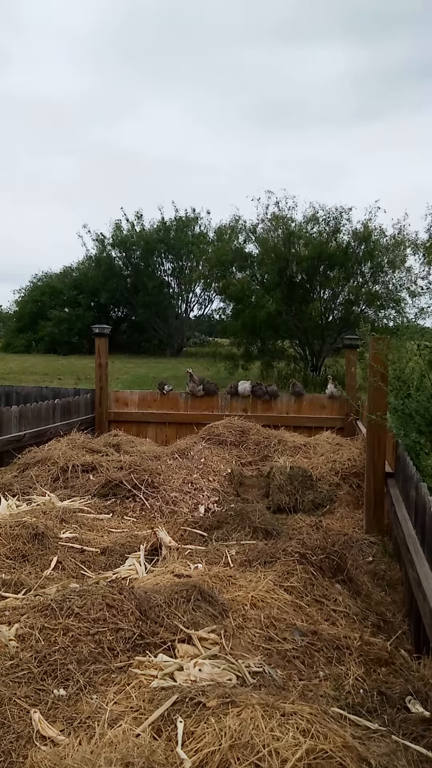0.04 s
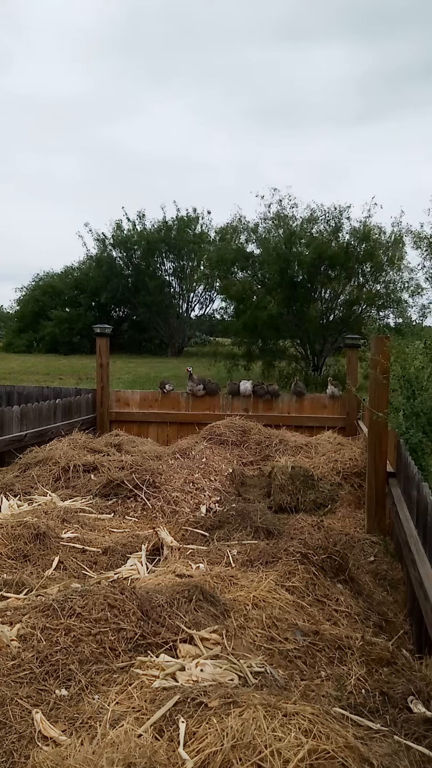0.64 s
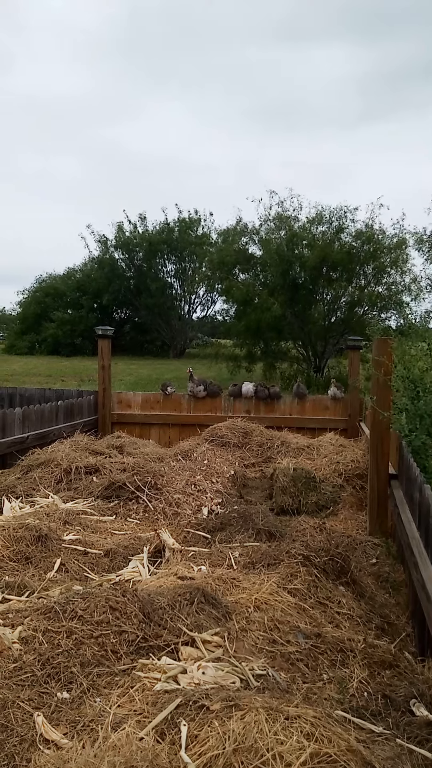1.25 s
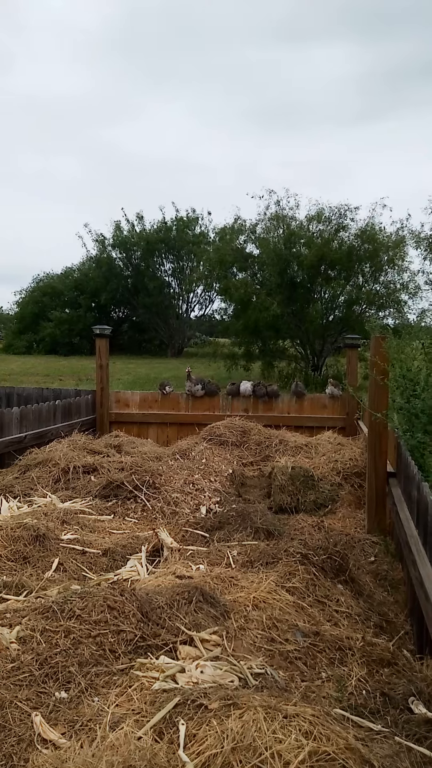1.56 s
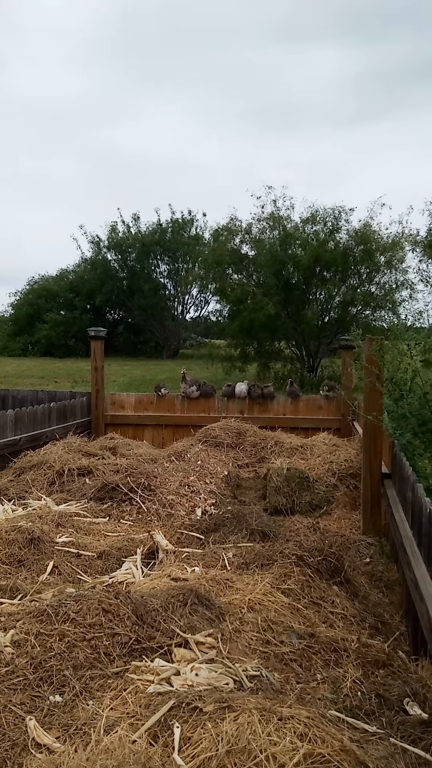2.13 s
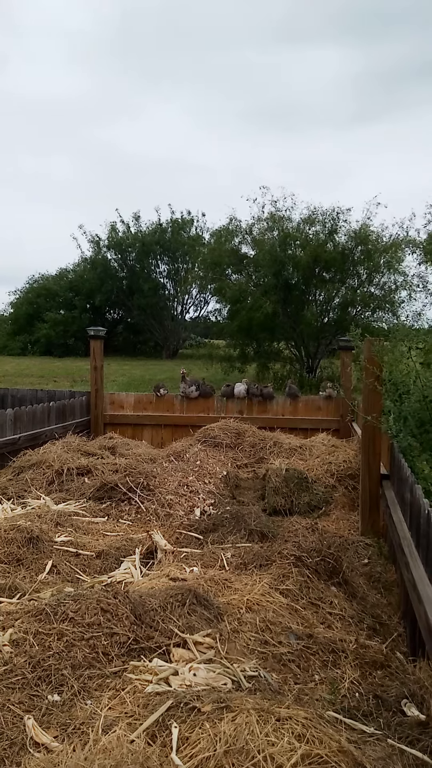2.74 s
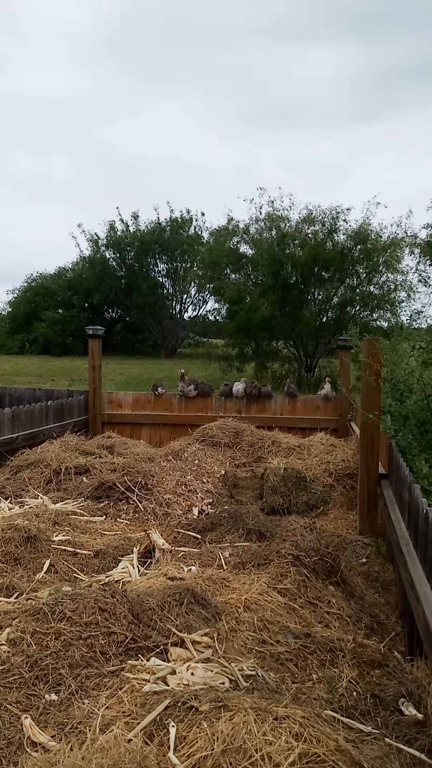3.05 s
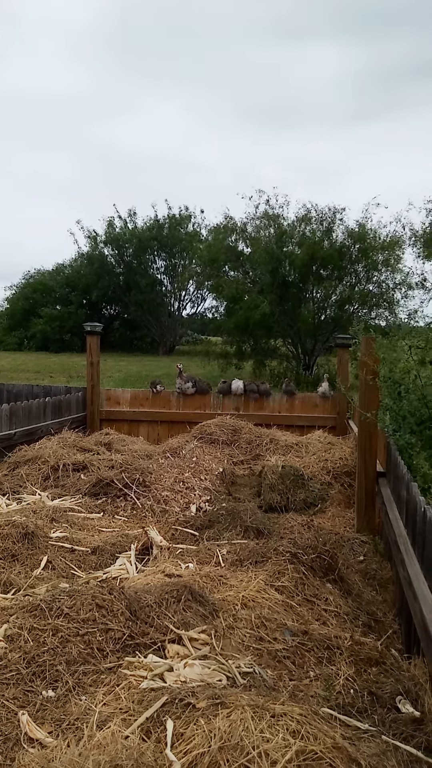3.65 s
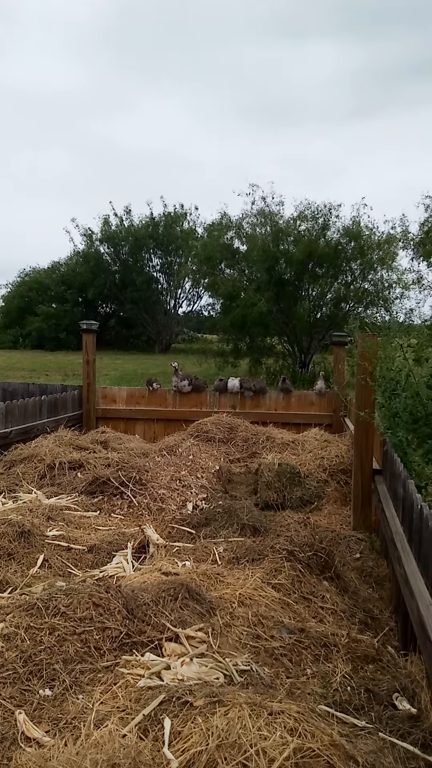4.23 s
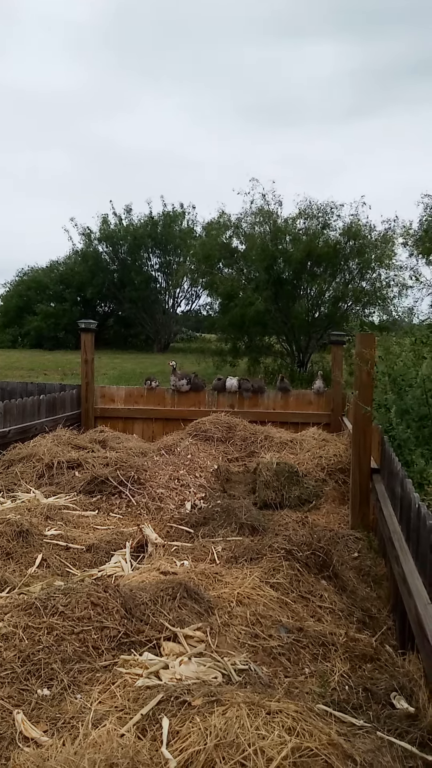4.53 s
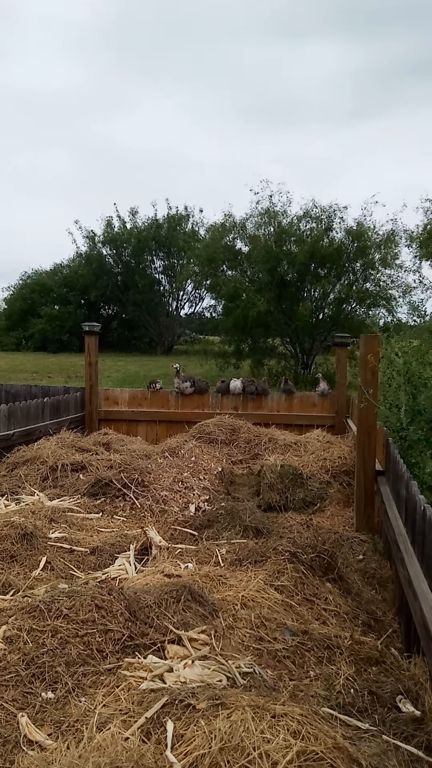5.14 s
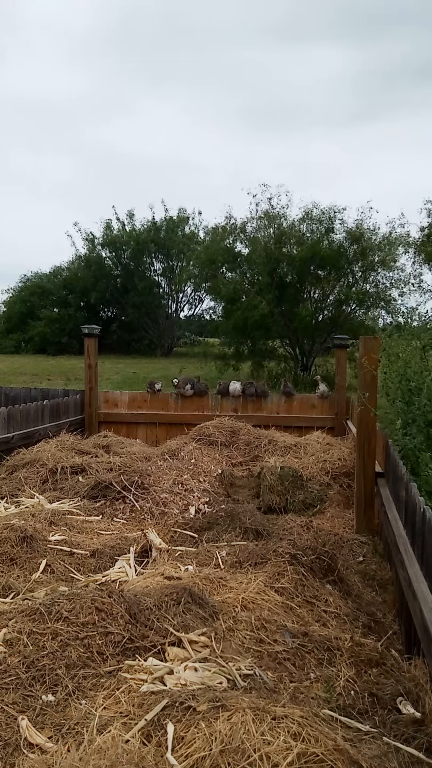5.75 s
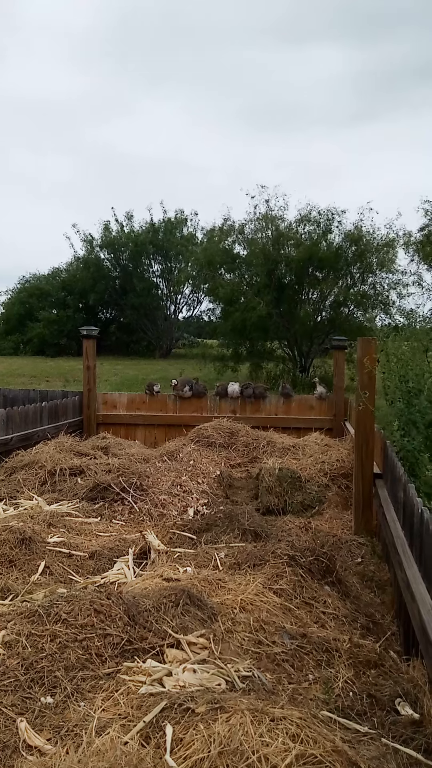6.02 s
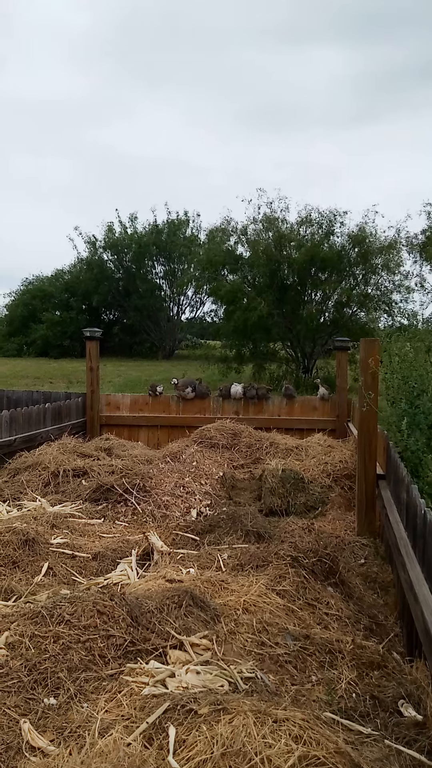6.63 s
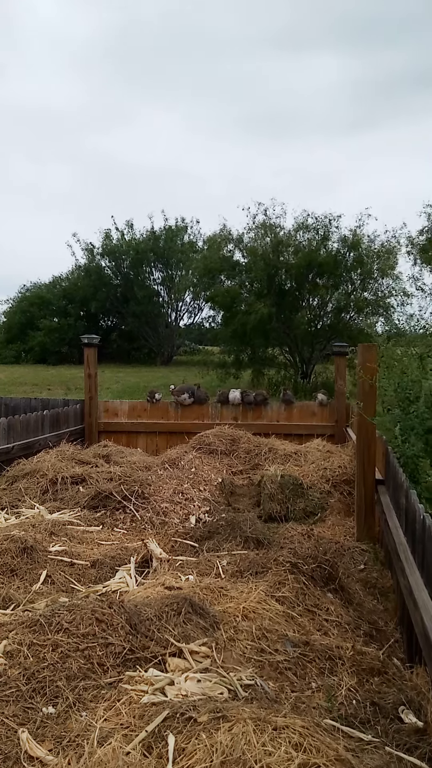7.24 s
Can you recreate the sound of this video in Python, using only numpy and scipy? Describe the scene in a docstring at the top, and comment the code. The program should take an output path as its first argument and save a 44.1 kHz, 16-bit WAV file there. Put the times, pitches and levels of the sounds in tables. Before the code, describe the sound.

A guinea hen calls from some metres away in an open farmyard, repeating a short rasp and a longer, harsh squawk that drops in pitch. The pair comes about every 0.6 seconds, from the start until the end at around 7.4 seconds. A second bird gives short, rough barks near 0.1, 1.1, 2.8, 3.5 and 4.4 seconds. Faint chirps and peeps are scattered throughout, and thin rising whistles come at about 0.3 and 1.2 seconds, then more clearly at 4.3, 5, 5.7 and 6.5. Wind rumbles on the microphone, with a small gust near 1 second and stronger, fluttering buffets and low thumps from 2.5 seconds, heaviest between about 3 and 5 and again around 6.6. The calls carry only a slight outdoor echo. Underneath lie quiet field noise, a soft insect shimmer and a very faint high whine.

```python
"""Guinea fowl in a windy farmyard.

A hen on a wooden fence, some metres off across a straw heap, repeats a short rasp and a long squawk.
The two sides of her syrinx beat into harsh sub-harmonics, shaped by throat and opening beak.
A second bird barks, the two loudest barks opening on a high note, amid whistles, chirps and peeps.
Fence, straw and trees scatter the calls.
Gusts buffet the microphone over quiet field noise, insects and a faint high whine."""
import sys
import numpy as np
from scipy import signal
from scipy.fft import rfft, irfft, next_fast_len
from scipy.io import wavfile
from scipy.ndimage import uniform_filter1d

SR = 44100
rng = np.random.default_rng(int(sys.argv[2]) if len(sys.argv) > 2 else 0)


def transcribe(signal):
    """Save signal, clipped to [-1, 1], as a 16-bit WAV file at the path in sys.argv[1]."""
    frames = np.atleast_2d(signal).T
    limited = np.clip(frames, -1, 1)
    pcm = np.round(limited * 32767).astype(np.int16)
    wavfile.write(sys.argv[1], SR, pcm)


N = 325458
TIME_S = np.arange(N) / SR
CUTOFF_HZ = 15750

# field noise spectrum: freq_hz, gain_db
FIELD_SPECTRUM = [(30, 0.5), (150, -3), (300, -15.5), (600, -16), (1200, -13), (2000, -19), (3000, -25.5),
                  (4000, -17), (5200, -36.5), (6300, -32.5), (8500, -32), (12000, -31.5), (15500, -37)]
# field noise gain below the treble shelf: time_s, gain_db
FIELD_GAIN = [(0, -62), (1, -63), (2, -64), (3, -64.5), (4, -63.5), (5, -61.5), (5.8, -65.5), (6.6, -56.5),
              (7.38, -58.5)]
# insect shimmer spectrum: freq_hz, gain_db
INSECT_SPECTRUM = [(4300, -33), (4950, 1), (5300, 0), (5700, -4.5), (6400, -15.5), (6750, -8), (7000, -4.5),
                   (7300, -27.5), (7650, -2), (8100, -36.5), (10000, -48)]
# steady whine: pitch_hz, level_db
WHINE_TONES = [(6998, -87.5), (7644, -90), (11994, -100)]
# brief swells of the whine: start_s, length_s, pitch_hz, level_db
WHINE_PEAKS = [(.8, .2, 7644, -79), (1.94, .3, 7644, -78), (3.038, 0.033, 7540, -68)]

# wind rumble spectrum: freq_hz, gain_db
RUMBLE_SPECTRUM = [(20, -39), (35, -33), (55, -4.5), (80, 4.5), (140, 2.5), (210, -4.5), (300, -15.5),
                   (450, -35.5), (900, -57.5), (2000, -85.5)]
# wind flutter spectrum: freq_hz, gain_db
FLUTTER_SPECTRUM = [(120, -25.5), (250, 6.5), (350, 3.5), (520, -6.5), (750, -19), (1100, -31),
                    (1800, -60.5), (4000, -97.5)]
# rumble between gusts: time_s, level_db
BREEZE_LEVEL = [(0, -50), (.85, -55.5), (1.12, -42), (1.6, -44), (2.0, -46), (2.45, -38.5), (2.78, -46.5),
                (3.03, -28.5), (3.42, -43.5), (3.75, -32.5), (4.5, -30), (4.75, -41.5), (5.02, -29.5),
                (5.33, -32), (5.52, -44.5), (5.87, -34.5), (6.42, -43), (6.76, -36.5), (7.38, -53)]
# gusts: start_s, length_s, rumble_db, flutter_re_rumble_db
WIND_GUSTS = [(0.429, .035, -37, -18), (.94, .16, -28.5, -8), (1.321, 0.21, -35, -15),
              (2.103, 0.074, -33, -29), (2.238, 0.07, -36, -25), (2.456, 0.075, -25, -2.5),
              (2.52, 0.076, -25.5, -3.5), (2.908, 0.063, -24, 1.5), (2.966, 0.073, -24.5, -4),
              (3.069, 0.042, -24, -2.5), (3.208, 0.04, -27, -3), (3.41, 0.039, -38.5, 0),
              (3.528, .12, -29, -19), (3.663, .09, -19, -9), (3.796, .09, -25.5, -8),
              (3.958, 0.13, -26, -9.5), (4.069, 0.16, -22, -10.5), (4.28, .11, -23, -11),
              (4.477, 0.096, -28.5, -7.5), (4.601, 0.093, -30, -11), (4.785, 0.053, -28.5, -3),
              (4.878, 0.056, -19.5, -9), (4.923, 0.14, -25.5, -5), (5.228, 0.22, -32, -6.5),
              (5.598, 0.069, -30.5, -7), (5.721, 0.045, -28.5, -5.5), (5.792, 0.047, -31, -3),
              (6.1, 0.044, -26, -8.5), (6.224, 0.12, -28, -16), (6.505, 0.14, -25.5, -6.5),
              (6.649, 0.051, -27, -12), (6.717, 0.061, -21.5, -14), (6.823, 0.075, -37, -6),
              (6.994, 0.035, -31.5, 0), (7.072, 0.048, -27.5, -9), (7.299, 0.039, -37, -17)]
# hardest eddies: centre_s, peak_db, centre_hz
EDDY_SLAPS = [(2.4704, -13, 256), (2.4759, -19, 350), (2.4884, -16.5, 342), (2.545, -20.5, 334),
              (2.921, -18.5, 263), (2.9426, -10.5, 626), (2.946, -11.5, 480), (2.985, -13.5, 358),
              (3.094, -18, 310), (3.278, -16.5, 125), (3.674, -17, 230), (3.702, -14, 283),
              (3.762, -14.5, 594), (3.807, -14, 157), (4.133, -19.5, 308), (4.298, -16, 200),
              (4.79, -18.5, 280), (5.742, -14.5, 345), (5.8, -20.5, 290), (6.193, -29, 288)]

# chirps, peeps and the high opening notes of the two loudest barks:
# start_s, length_s, first_hz, last_hz, relative_db, roughness
SHORT_NOTES = [(0.0, 0.022, 3200, 2990, -50, 0.12), (0.016, 0.041, 3740, 3050, -57, 0.2),
               (0.583, 0.043, 2400, 2890, -53.5, 0), (.88, .04, 1420, 1270, -54.5, .3),
               (0.885, .047, 2760, 2480, -60, .6), (1.049, .02, 2530, 2820, -57, .1),
               (1.068, .036, 1690, 1610, -38, 0.02), (1.215, .02, 2340, 2400, -59, 0.1),
               (1.27, .03, 3600, 2040, -57, 0.3), (1.485, .04, 3400, 2050, -62, .2),
               (1.55, .08, 2990, 2890, -59, 0.18), (1.606, 0.018, 2110, 2290, -52.5, 0.15),
               (1.702, 0.039, 3450, 1950, -58, 0), (1.814, 0.028, 1960, 2320, -54.5, 0.1),
               (2.135, 0.039, 3800, 1780, -58, 0.3), (2.25, .03, 2020, 2310, -59, .05),
               (3.523, 0.078, 2320, 2400, -54, 0), (3.56, 0.04, 1650, 1593, -39.5, 0),
               (3.936, 0.018, 2724, 1960, -38, 0.33), (4.032, 0.02, 2995, 2210, -41.5, 0.2),
               (4.042, 0.028, 2237, 2244, -43.5, 0), (4.771, .066, 2870, 3140, -41, 0.77),
               (4.86, 0.033, 2360, 2300, -40, 0.13), (5.4, .017, 2780, 2940, -49.5, 0.26),
               (5.554, 0.045, 2260, 2310, -51.5, 0.2), (5.604, 0.073, 2870, 2980, -42.5, 0.42),
               (5.925, .021, 3520, 3400, -39.5, 0), (5.927, 0.035, 3074, 2724, -41, 0.53),
               (6.623, 0.054, 2985, 3113, -39, 0.43), (6.884, 0.063, 3010, 3064, -35, 0.3),
               (7.231, 0.038, 3480, 2876, -36, 0.36)]
# rising whistles: start_s, length_s, lowest_hz, last_hz, level_db, loudest_at_frac
WHISTLE_NOTES = [(0.278, 0.13, 2318, 2714, -37, 0.82), (1.248, .095, 2407, 2660, -37, 0.93),
                 (4.298, 0.11, 2380, 2680, -29.5, 0.67), (4.999, .12, 2387, 2760, -27.5, 0.65),
                 (5.697, 0.12, 2385, 2770, -32, 0.68), (6.524, 0.12, 2430, 2766, -33.5, 0.71)]
# second bird's throat resonances: freq_hz, gain_db
BARK_RESONANCES = [(350, -50), (700, -14.5), (950, 2.5), (1300, 7.5), (1650, -3.5), (2000, -2),
                   (2550, -3.5), (3100, -7.5), (3800, -9), (4400, -25), (5000, -23), (6500, -55.5),
                   (9500, -58), (13000, -44.5), (15500, -62)]
# barks: start_s, length_s, level_db, top_hz, arch_frac, roughness, overtones_db
BARK_NOTES = [(0.14, 0.079, -32.5, 1207, 0.049, 0.9, -19), (1.074, 0.06, -29, 1322, 0.11, 0.9, -4.5),
              (2.75, 0.09, -39, 1254, 0.016, 0.08, 3.5), (2.82, 0.036, -33, 1015, 0.036, 0.18, -1.5),
              (3.412, 0.042, -33, 1263, 0.081, 0.29, -4), (3.562, .085, -28.5, 1336, 0.16, 0.78, -1.5),
              (4.273, 0.036, -34, 1240, 0.089, 0.14, -2), (4.421, 0.092, -30, 1287, 0.12, 0.78, -1)]

# hen's throat and beak resonances: freq_hz, gain_db
HEN_RESONANCES = [(500, -54), (850, -24), (1060, -9), (1300, -3), (1550, -9.5), (1750, -3.5), (2120, 3),
                  (2600, 1), (3100, -2.5), (3550, -10.5), (4200, -13.5), (5200, -20), (6500, -43.5),
                  (9500, -61), (12500, -39.5), (15500, -46)]
# hen's rasps: start_s, length_s, relative_db
RASP_NOTES = [(0.504, 0.089, -35.5), (1.117, 0.067, -34), (1.72, 0.081, -35.5), (2.338, 0.066, -33),
              (2.968, 0.071, -39), (3.62, 0.053, -34.5), (4.148, 0.048, -42.5), (4.241, 0.053, -29.5),
              (4.836, .072, -36), (5.458, 0.093, -35.5), (6.098, 0.06, -35.5), (6.7, 0.065, -36),
              (7.328, 0.091, -32)]
# hen's squawks: start_s, length_s, relative_db, closing_hz, harsh_at_frac, closing_roughness
SQUAWK_NOTES = [(.078, 0.17, -36.5, 1026, 0.21, 0.3), (0.689, 0.18, -34.5, 1069, 0.096, 0.9),
                (1.297, .16, -35, 1060, .09, 0.99), (1.91, .16, -35, 1060, 0.04, 1.1),
                (2.515, .2, -35, 1059, 0.22, 0.58), (3.143, .18, -37, 1040, 0.21, 0.23),
                (3.804, .19, -37, 1049, 0.077, .65), (4.417, .17, -35.5, 1075, 0.2, 0.83),
                (5.016, 0.18, -35.5, 1026, 0.24, 0.3), (5.641, .2, -35, 1048, 0.24, 0.65),
                (6.268, .17, -33, 1037, 0.19, 0.3), (6.887, .19, -34.5, 1028, 0.24, 0.83)]
# effort through a squawk: progress_frac, gain_db, treble_db
SQUAWK_EFFORT = [(0, -30, -11), (0.121, -9.5, -21.5), (.3, -6, 5.5), (0.619, 0, -5), (.8, -8.5, 3),
                 (0.999, -31.5, 18)]
# sizzle at the beak: freq_hz, gain_db
SIZZLE_SPECTRUM = [(5000, -32), (5800, 5.5), (6800, -23), (10500, -17.5), (12200, 2.5), (13500, -8),
                   (15500, -10)]


def from_db(db):
    """Decibels to gain."""
    return 10 ** (np.asarray(db) / 20)


def rms_one(x):
    """Scale to unit power."""
    return x / np.sqrt(np.mean(x ** 2) + 1e-20)


def at_hz(spectrum, hz):
    """Gain of a spectrum at these frequencies."""
    known_hz, gain_db = np.transpose(spectrum)
    return from_db(np.interp(np.log(np.maximum(hz, 1)), np.log(known_hz), gain_db))


def coloured(spectrum, size):
    """Unit-power noise with this spectrum."""
    padded = next_fast_len(size)
    gains = at_hz(spectrum, np.fft.rfftfreq(padded, 1 / SR))
    return rms_one(irfft(rfft(rng.standard_normal(padded)) * gains, padded)[:size])


def drift(rate_hz, size):
    """Smooth random wander, unit power."""
    pole = np.exp(-2 * np.pi * rate_hz / SR)
    noise = rng.standard_normal(size + SR // 8)
    return rms_one(signal.lfilter([1], [1, -2 * pole, pole * pole], noise)[-size:])


def evened(x, window_s):
    """Hold unit power over a sliding window."""
    return x / np.sqrt(np.abs(uniform_filter1d(x * x, max(int(window_s * SR), 2))) + 1e-12)


def add(out, start_s, sound):
    """Mix in a sound with tapered ends."""
    at = int(np.clip(start_s * SR, 0, N - 1))
    out[at:at + len(sound)] += (sound * signal.windows.tukey(len(sound), .1))[:N - at]


def switch(x, at, width):
    """Smooth step from 0 to 1."""
    return .5 + .5 * np.tanh((x - at) / width)


def swell(progress, skew, power):
    """Rounded envelope; skew above 1 delays the peak."""
    return np.maximum(np.sin(np.pi * progress ** skew), 0) ** power


def shelf(x, above_hz, gain_db):
    """High shelf."""
    highs = signal.sosfiltfilt(signal.butter(3, above_hz, "high", fs=SR, output="sos"), x)
    return x + (from_db(gain_db) - 1) * highs


def muffle(x, top_hz):
    """Steep low-pass."""
    return signal.sosfilt(signal.butter(8, top_hz, fs=SR, output="sos"), x)


def field_noise(treble_hz=3500, treble_gain_db=-63.5):
    """Distant leaves and air; the treble holds steady as the rest drifts."""
    gain_db = np.interp(TIME_S, *np.transpose(FIELD_GAIN))
    return from_db(gain_db) * shelf(coloured(FIELD_SPECTRUM, N), treble_hz, treble_gain_db - gain_db)


def insects():
    """Shimmer of insects in the grass."""
    return from_db(-75.5 + 3.6 * drift(22, N)) * coloured(INSECT_SPECTRUM, N)


def whine():
    """Thin wavering tones with a few brief swells."""
    out = np.zeros(N)
    for pitch_hz, level_db in WHINE_TONES:
        gain = from_db(level_db + 2.5 * drift(8.9, N))
        out += gain * np.sin(2 * np.pi * np.cumsum(pitch_hz + 3 * drift(23, N)) / SR)
    for start_s, length_s, pitch_hz, level_db in WHINE_PEAKS:
        t = TIME_S[:int(length_s * SR)]
        envelope = from_db(level_db) * np.sin(np.pi * t / length_s)
        add(out, start_s, envelope * np.sin(2 * np.pi * pitch_hz * t))
    return np.sqrt(2) * out


def wind(stiff_breeze_db=-32, stiff_flutter_db=-45.5, flutter_db_per_db=2.14):
    """Rumble on the microphone port; strong gusts are less deep and break into lumpy flutter."""
    breeze_db = np.interp(TIME_S, *np.transpose(BREEZE_LEVEL))
    rumble_power = from_db(breeze_db) ** 2
    flutter_power = from_db(stiff_flutter_db + flutter_db_per_db * (breeze_db - stiff_breeze_db)) ** 2
    for start_s, length_s, rumble_db, flutter_re_rumble_db in WIND_GUSTS:
        push = swell(np.linspace(0, 1, int(length_s * SR)), skew=.89, power=.73)
        flutter_gain = from_db(rumble_db + flutter_re_rumble_db) * push ** flutter_db_per_db
        add(rumble_power, start_s, (from_db(rumble_db) * push) ** 2)
        add(flutter_power, start_s, flutter_gain ** 2)
    strength = switch(10 * np.log10(rumble_power), at=-28.5, width=3.3)
    rumble = shelf(coloured(RUMBLE_SPECTRUM, N), 130, 6.9 * strength - 3.5)
    rumble = evened(rumble * from_db(4.7 * drift(30, N)), .039)
    flutter = evened(coloured(FLUTTER_SPECTRUM, N) * from_db(6.9 * drift(55, N)), .045)
    return np.sqrt(rumble_power) * rumble + np.sqrt(flutter_power) * flutter


def eddies():
    """Each passing eddy gives one push and pull of pressure."""
    out = np.zeros(N)
    t = TIME_S[:SR // 50] - .01
    for centre_s, peak_db, centre_hz in EDDY_SLAPS:
        phase = 2 * np.pi * centre_hz * t
        add(out, centre_s + t[0], -from_db(peak_db) * phase * np.exp((1 - phase ** 2) / 2))
    return out


def yard(x, near_db, near_t60_s, far_db, far_t60_s=.5):
    """Fence and straw scatter at once; trees return a faint, duller tail."""
    t = TIME_S[:SR]
    near = rms_one(rng.standard_normal(SR) * from_db(-60 * t / near_t60_s) * (t > .003))
    far = rng.standard_normal(SR) * from_db(-60 * t / far_t60_s) * switch(t, .04, .015)
    far = signal.sosfilt(signal.butter(2, 4200, fs=SR, output="sos"), rms_one(far))
    response = (from_db(near_db) * near + from_db(far_db) * far) / np.sqrt(SR)
    return x + signal.fftconvolve(x, response)[:N]


def pure_note(pitch_hz, jitter, second_db, third_db):
    """Near-sine with two faint overtones."""
    phase = 2 * np.pi * np.cumsum(pitch_hz * (1 + jitter * drift(230, len(pitch_hz)))) / SR
    overtones = from_db(second_db) * np.sin(2 * phase) + from_db(third_db) * np.sin(3 * phase)
    return np.sqrt(2) * (np.sin(phase) + overtones)


def far_call(start_s=6.68, length_s=.68, pitch_hz=1378, level_db=-65):
    """A distant bird holds one slightly rising note."""
    out = np.zeros(N)
    u = np.linspace(0, 1, int(length_s * SR))
    note = pure_note(pitch_hz * (1 + .0378 * (u - .5)), jitter=.022, second_db=-22, third_db=-39)
    add(out, start_s, from_db(level_db) * swell(u, skew=1.2, power=.23) * note)
    return out


def short_notes(gain_db=-2.5):
    """Chirps, peeps and two bark openings: glides that slow toward their last pitch; rough ones scratch."""
    out = np.zeros(N)
    for start_s, length_s, first_hz, last_hz, relative_db, roughness in SHORT_NOTES:
        u = np.linspace(0, 1, int(length_s * SR))
        pitch_hz = last_hz + (first_hz - last_hz) * (1 - u) ** 1.6
        note = pure_note(pitch_hz, jitter=.055 * roughness, second_db=-18.5, third_db=-51)
        scratch = 1 + 1.05 * roughness * drift(500, len(u))
        envelope = from_db(gain_db + relative_db) * swell(u, skew=.94, power=.97)
        add(out, start_s, envelope * note * scratch)
    return muffle(out, 4900)


def whistles(turn_frac=.22, onset_db=-19, end_db=-22):
    """Plaintive notes that sink a little, then swell as they bend up."""
    out = np.zeros(N)
    for start_s, length_s, lowest_hz, last_hz, level_db, loudest_at in WHISTLE_NOTES:
        u = np.linspace(0, 1, int(length_s * SR))
        pitch_hz = lowest_hz + (last_hz - lowest_hz) * ((u - turn_frac) / (1 - turn_frac)) ** 2
        rise_db = onset_db * (1 - (u / loudest_at) ** 1.36)
        fall_db = end_db * ((u - loudest_at) / (1 - loudest_at)) ** 2
        effort_db = np.where(u < loudest_at, rise_db, fall_db) + 1.2 * drift(60, len(u))
        note = pure_note(pitch_hz, jitter=.003, second_db=-36.5, third_db=-44)
        add(out, start_s, from_db(level_db + effort_db) * note)
    return out


def membrane(pitch_hz, jitter, throat, count):
    """Harmonics of an unsteady syrinx membrane, weighted by the throat; one row each."""
    phase = 2 * np.pi * np.cumsum(pitch_hz * (1 + jitter * drift(260, len(pitch_hz)))) / SR
    k = np.arange(1, count + 1)[:, None]
    gains = at_hz(throat, k * pitch_hz) * (k * pitch_hz < CUTOFF_HZ)
    return gains * np.sin(k * phase + rng.uniform(0, 2 * np.pi, (count, 1)))


def barks():
    """Second bird: an arched note whose period doubles twice as it roughens."""
    out = np.zeros(N)
    k = np.arange(1, 45)[:, None]   # harmonics of a quarter of the pitch
    for start_s, length_s, level_db, top_hz, arch, roughness, overtones_db in BARK_NOTES:
        u = np.linspace(0, 1, int(length_s * SR))
        rough = roughness * (.45 + .85 * switch(u, .4, .15))
        pitch_hz = top_hz * (1 - arch * ((u - .65) / .45) ** 2)
        partials = membrane(pitch_hz / 4, .003 + .008 * rough, BARK_RESONANCES, count=len(k))
        partials *= np.where(k % 4 == 0, 1, np.where(k % 2 == 0, rough, rough * .7))
        wander_db = 3.5 + 3.4 * rough
        tone = rms_one(sum(partial * from_db(wander_db * drift(59, len(u))) for partial in partials))
        breath = from_db(-13) * rough * coloured(BARK_RESONANCES, len(u))
        voice = shelf(evened(tone + breath, .0069), 1820, overtones_db + 9 * (u - .55))
        voice = shelf(voice, 3200, 8 * (rough - .6))   # rough barks bite more
        add(out, start_s, from_db(level_db) * swell(u, skew=1.135, power=1.05) * voice)
    return out


def harsh_voice(pitch_hz, jitter, breath_db):
    """Both sides of the syrinx beat: wandering sub-harmonics in rattling turbulence."""
    size = len(pitch_hz)
    partials = membrane(pitch_hz, jitter, HEN_RESONANCES, count=28)[2:]
    tone = rms_one(sum(partial * from_db(5.6 * drift(130, size)) for partial in partials))
    breath_band = signal.butter(4, [1500, 4300], "band", fs=SR, output="sos")
    turbulence = signal.sosfilt(breath_band, coloured(HEN_RESONANCES, size))
    rattle = from_db(1.8 * drift(180, size))
    return evened(tone + from_db(breath_db) * rms_one(turbulence * rattle), .012)


def rasps(base_hz=507, spread_frac=.035, sag_frac=.06, gain_db=-11.5):
    """Hen's short first note: harsh, falling a little, mids hollowed by the half-closed beak."""
    out = np.zeros(N)
    for start_s, length_s, relative_db in RASP_NOTES:
        u = np.linspace(0, 1, int(length_s * SR))
        pitch_hz = base_hz * (1 + spread_frac * rng.standard_normal() - sag_frac * u)
        voice = harsh_voice(pitch_hz, jitter=.017, breath_db=-11.5)
        hollowed = shelf(shelf(voice, 1300, -17.5), 2900, 11)
        envelope = from_db(gain_db + relative_db) * swell(u, skew=1.3, power=1)
        add(out, start_s, envelope * rms_one(muffle(hollowed, 3400)))
    return out


def open_beak(voice, progress, edges_hz=(3630, 4190, 8700)):
    """The voice's top edge climbs as the beak goes from ajar to half open to wide."""
    half, wide = switch(progress, .24, .027), switch(progress, .512, .03)
    shares = (1 - half) * (1 - wide), half * (1 - wide), wide
    return sum(np.sqrt(share) * muffle(voice, top_hz) for share, top_hz in zip(shares, edges_hz))


def squawks(opening_hz=1542, opening_harshness=.12, harsh_frac=.36, gain_db=.5):
    """Hen's long note: opens high, breaks into a rasp, settles about a fifth lower."""
    out = np.zeros(N)
    progress, effort_db, treble_db = np.transpose(SQUAWK_EFFORT)
    for start_s, length_s, relative_db, closing_hz, harsh_at, roughness in SQUAWK_NOTES:
        u = np.linspace(0, 1, int(length_s * SR))
        roughness = min(roughness, 1)
        high_hz = opening_hz * (1 - .0748 * np.exp(-u / .098) + .035 * u)
        low_hz = closing_hz * (1 + .6 * (u - .62) ** 2)   # sags at peak effort
        high = membrane(high_hz, .009, HEN_RESONANCES, count=2).sum(0)
        high = rms_one(shelf(high, 2200, -2.5))   # nearly closed beak damps the overtone
        low = rms_one(membrane(low_hz, .0089 + .019 * roughness, HEN_RESONANCES, count=14).sum(0))
        harsh = harsh_voice(low_hz / 2, jitter=.0326, breath_db=-2)
        broken, cleared = switch(u, harsh_at, .021), switch(u, harsh_at + harsh_frac, .031)
        voice = (1 - .62 * broken) * (1 - cleared) * high
        voice += broken * (.23 + cleared * (1 - .5 * roughness)) * low
        voice += np.maximum(broken, opening_harshness) * (1 - cleared * (1 - roughness)) * harsh
        shelf_db = np.interp(u, progress, treble_db) + 1.8 * drift(61, len(u))
        voice = evened(shelf(open_beak(voice, u), 4700, shelf_db), .019)
        sizzle = from_db(-40) * coloured(SIZZLE_SPECTRUM, len(u))
        envelope = from_db(gain_db + relative_db + np.interp(u, progress, effort_db))
        add(out, start_s, envelope * (voice + sizzle))
    return out


def scene():
    """Mono mix of flock, wind and background; the short notes sit deeper in the echoes."""
    calls = squawks() + rasps() + barks() + whistles() + far_call()
    flock = yard(calls, near_db=-11, near_t60_s=.11, far_db=-27)
    flock += yard(short_notes(), near_db=-9, near_t60_s=.33, far_db=-30)
    return (flock + wind() + eddies() + whine() + insects() + field_noise())[None]


def record(dry):
    """Microphone: bass cut, soft clip on the strongest gusts, steep top cut."""
    heard = signal.sosfilt(signal.butter(2, 32, "high", fs=SR, output="sos"), dry)
    rounded = heard / (1 + (heard / .42) ** 4) ** (1 / 4)
    return signal.sosfilt(signal.ellip(10, .2, 80, CUTOFF_HZ, fs=SR, output="sos"), rounded)


dry = scene()
out = record(dry)
transcribe(out)
```